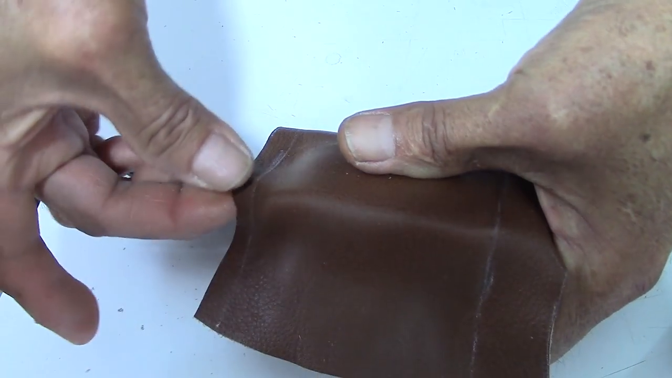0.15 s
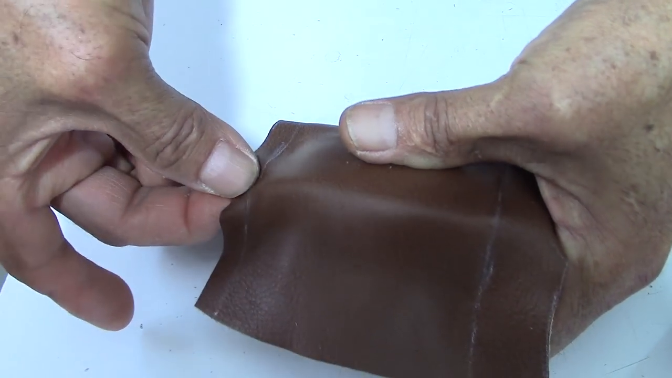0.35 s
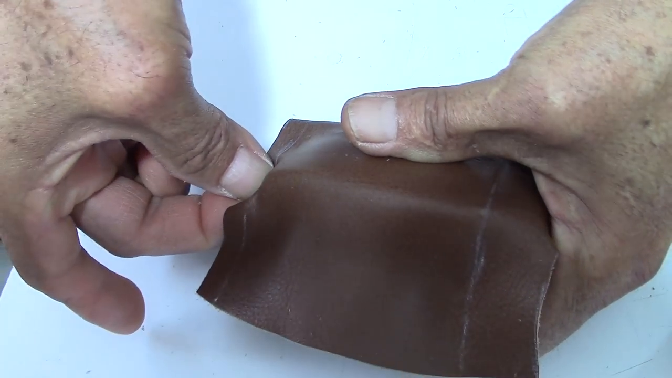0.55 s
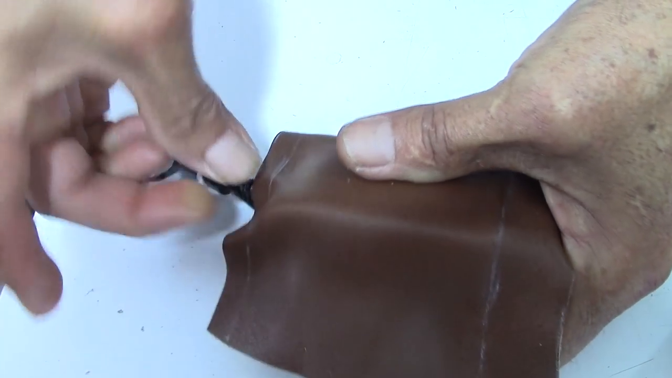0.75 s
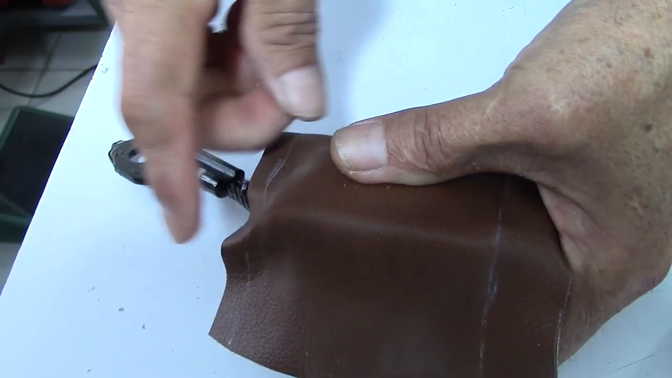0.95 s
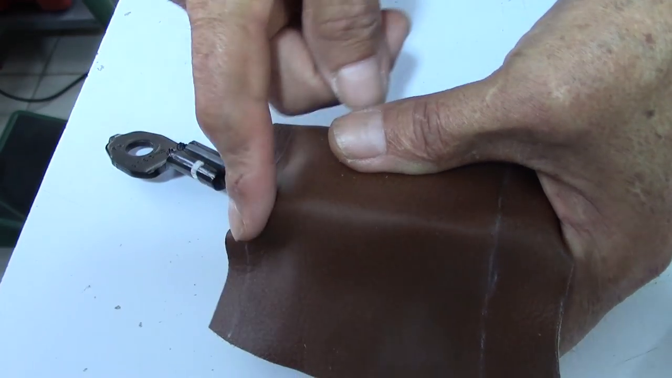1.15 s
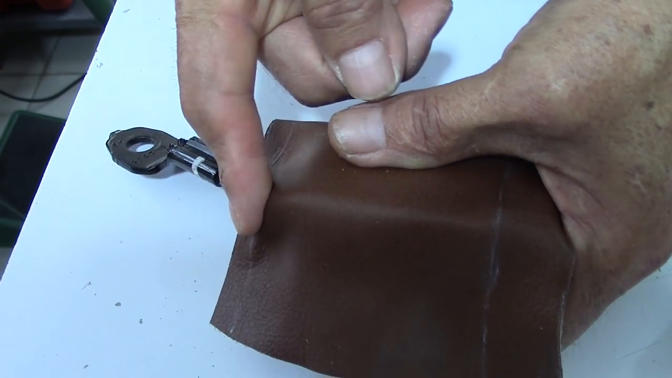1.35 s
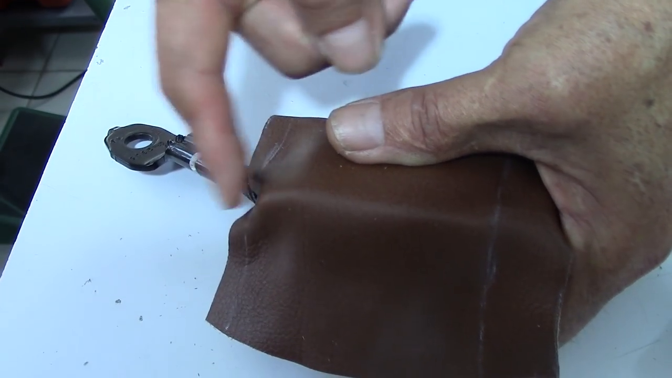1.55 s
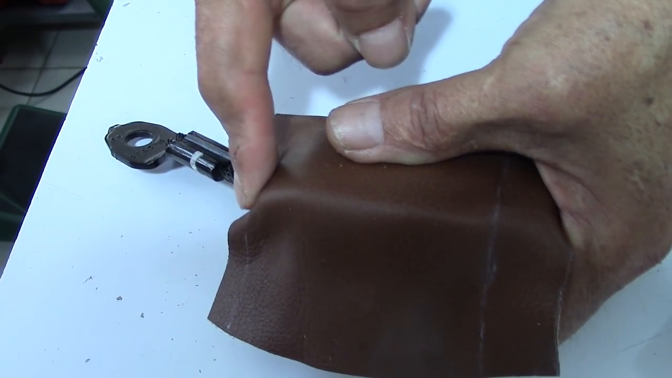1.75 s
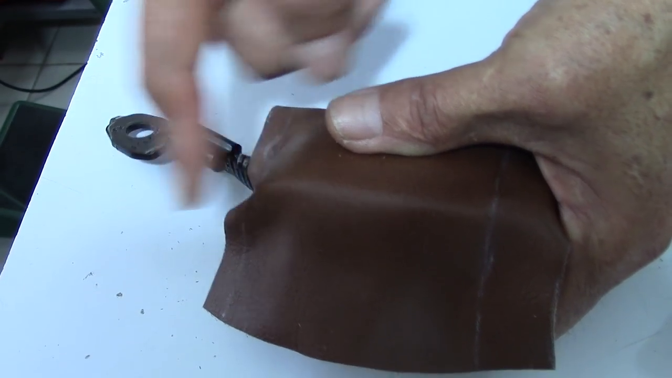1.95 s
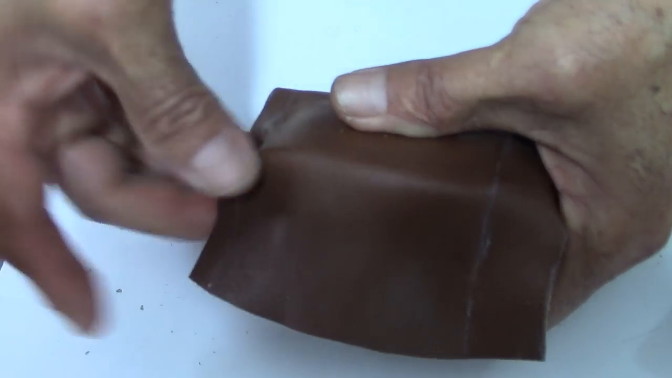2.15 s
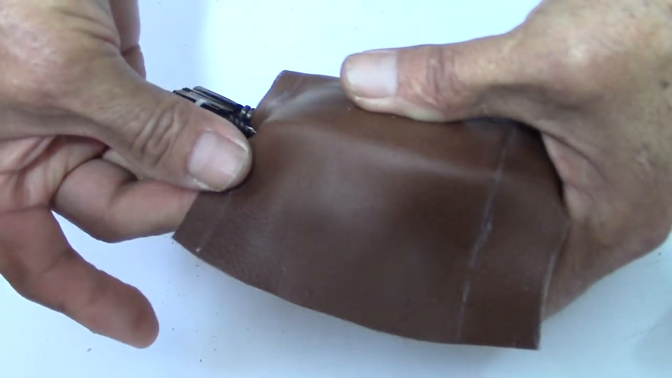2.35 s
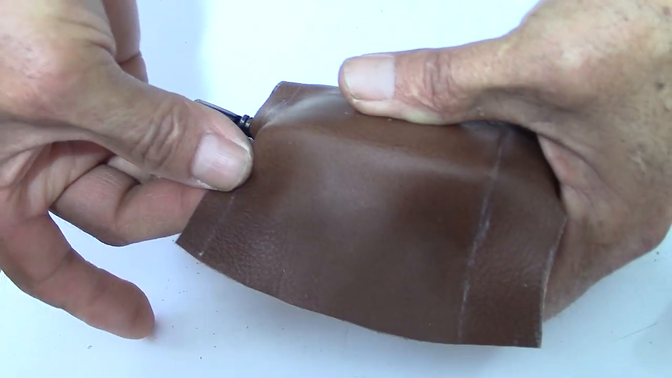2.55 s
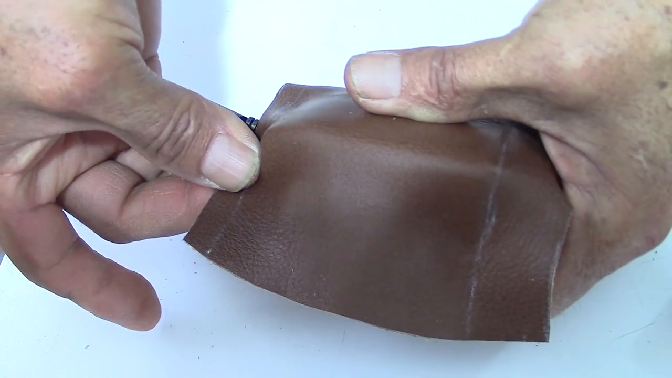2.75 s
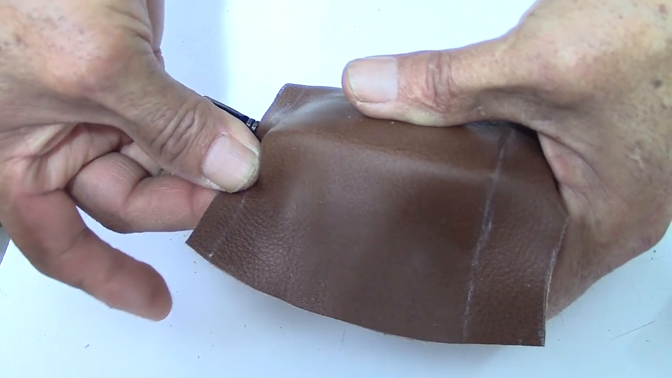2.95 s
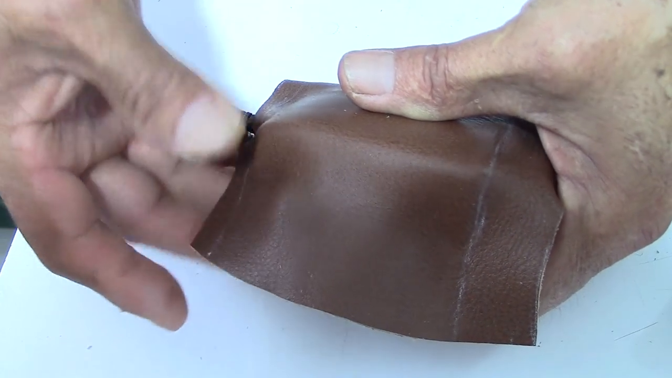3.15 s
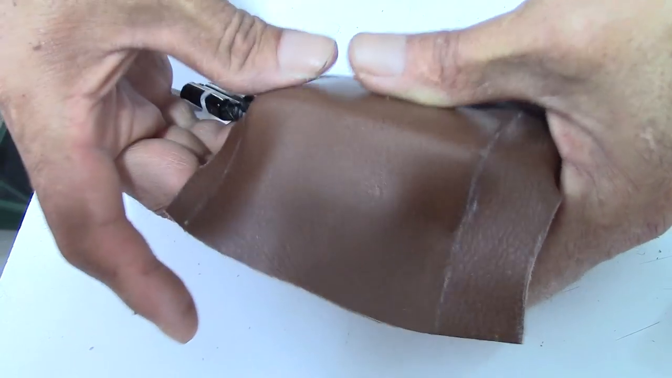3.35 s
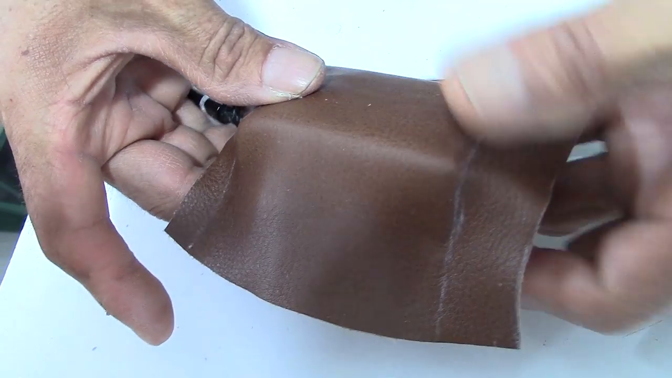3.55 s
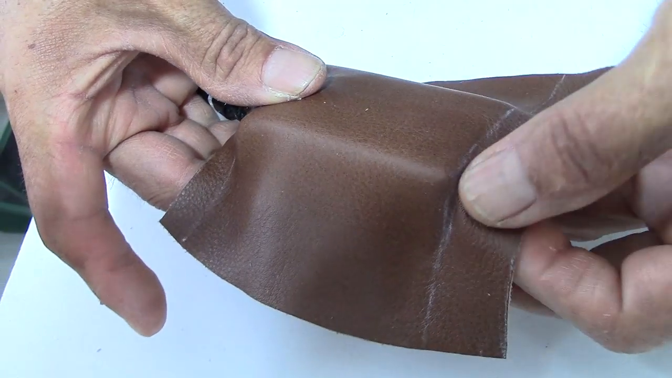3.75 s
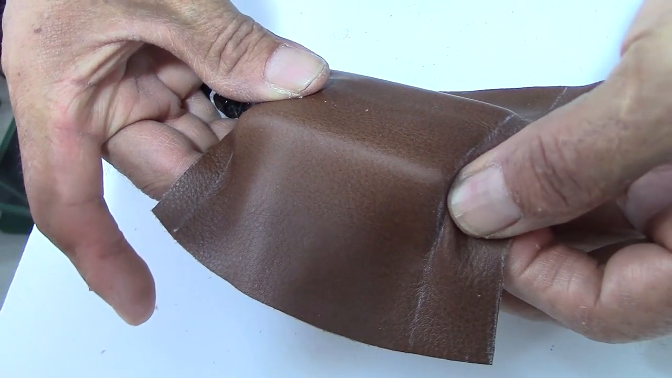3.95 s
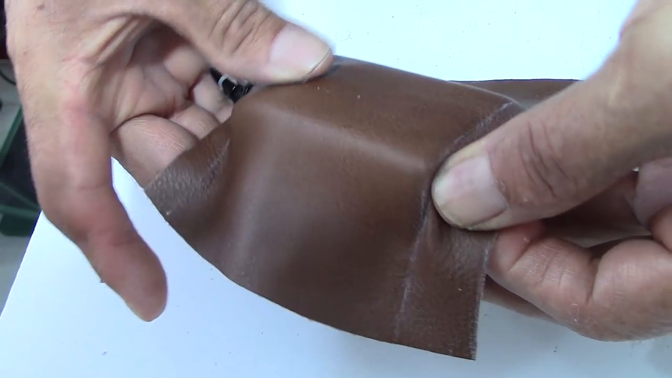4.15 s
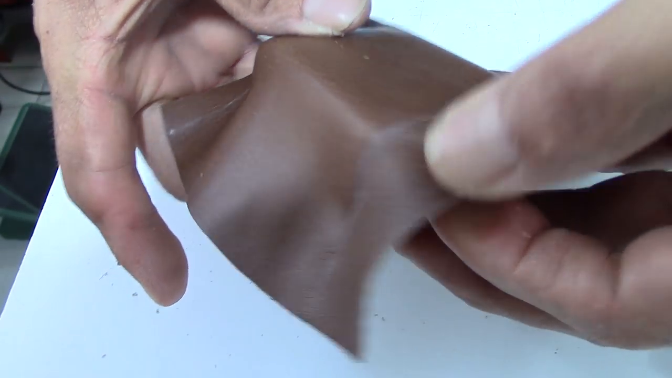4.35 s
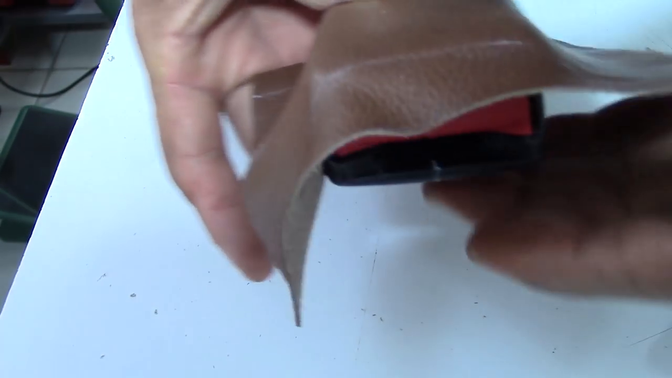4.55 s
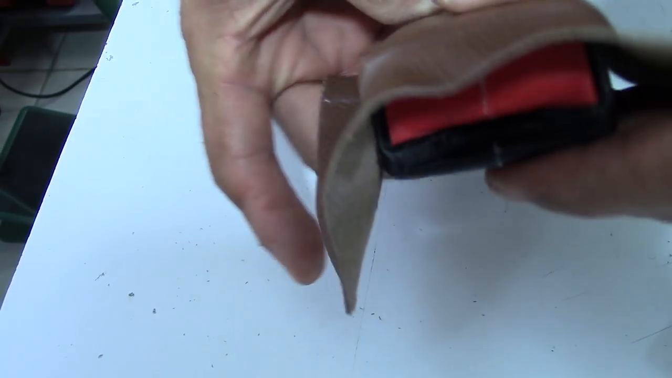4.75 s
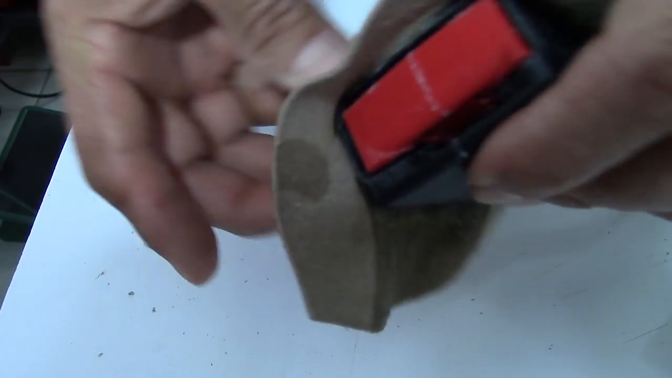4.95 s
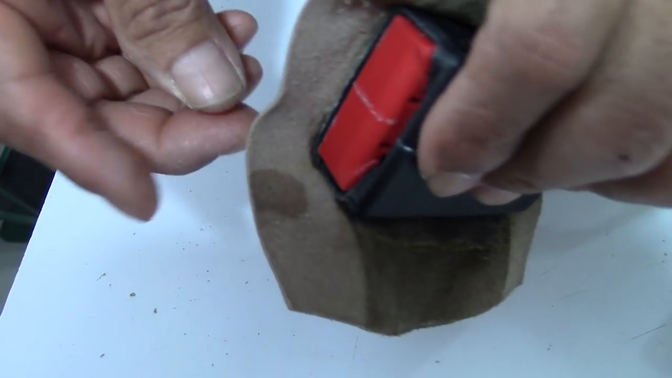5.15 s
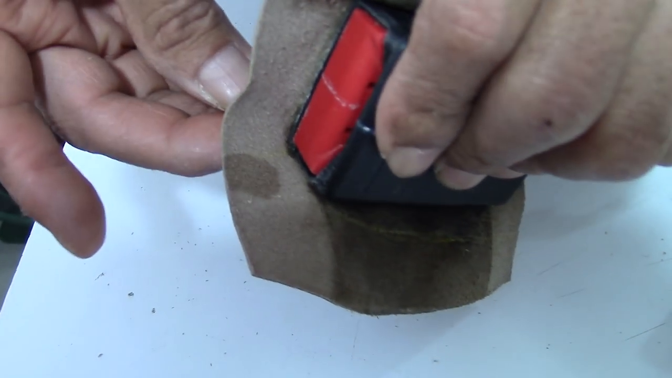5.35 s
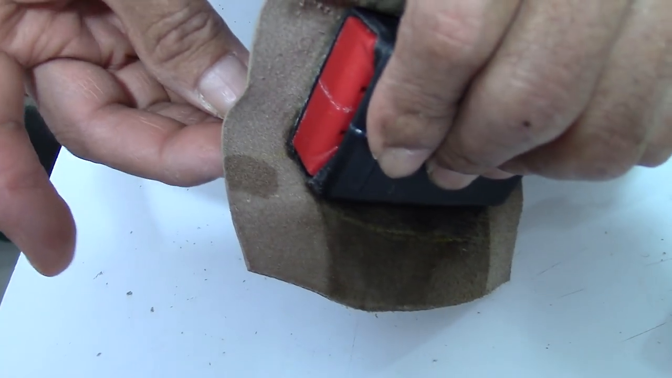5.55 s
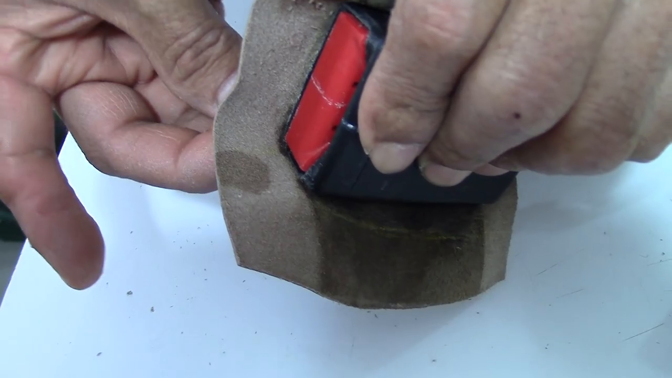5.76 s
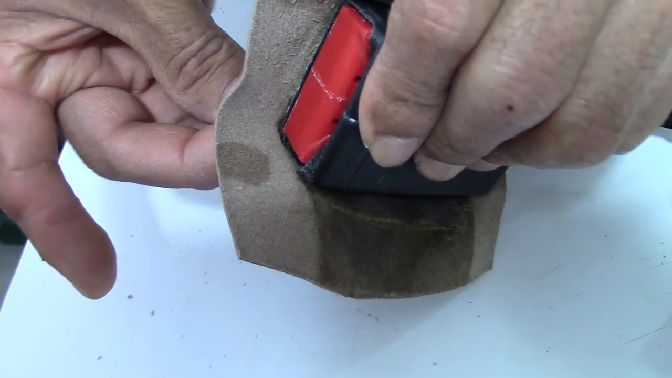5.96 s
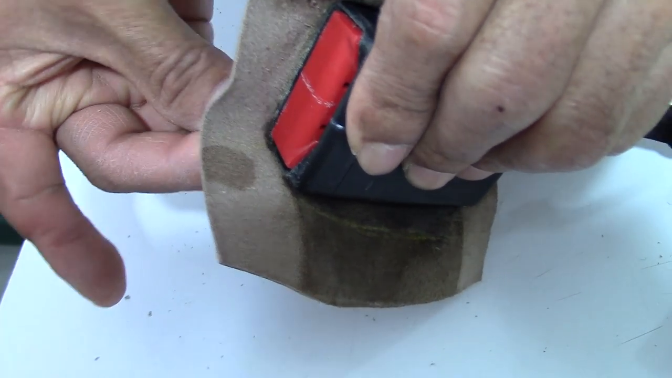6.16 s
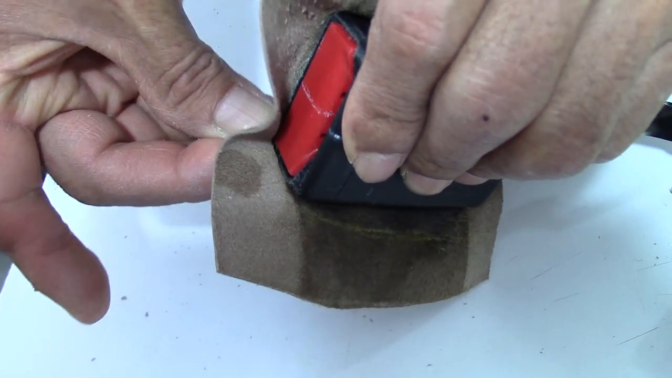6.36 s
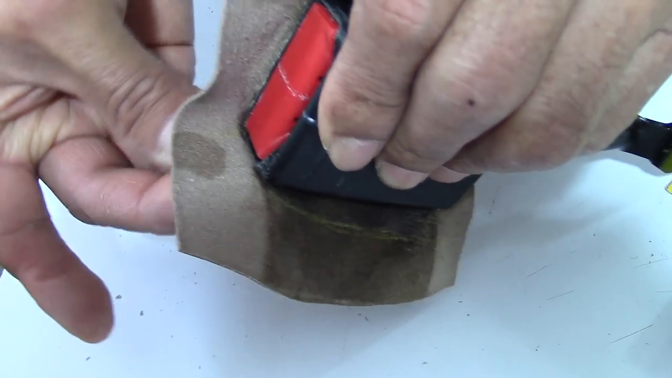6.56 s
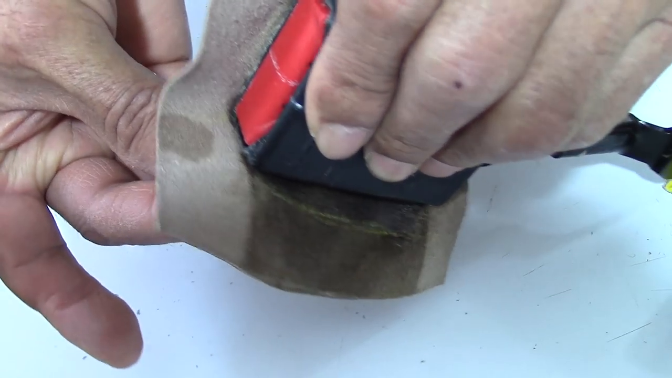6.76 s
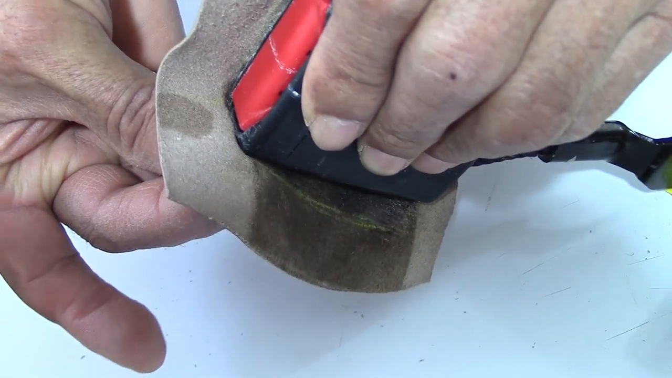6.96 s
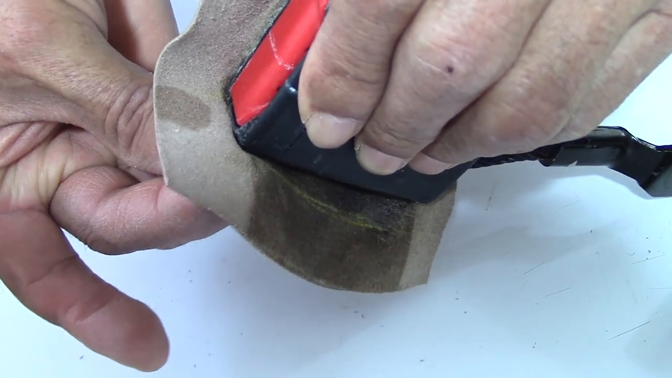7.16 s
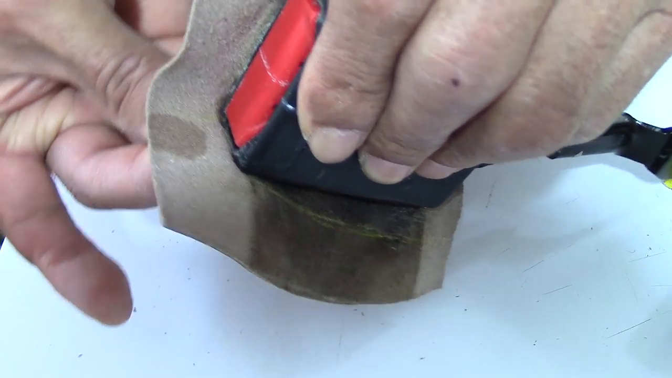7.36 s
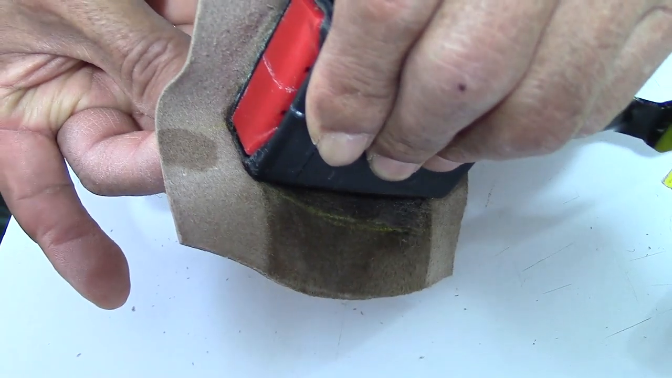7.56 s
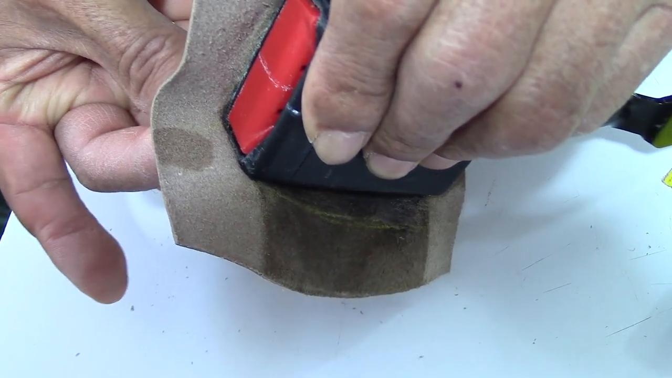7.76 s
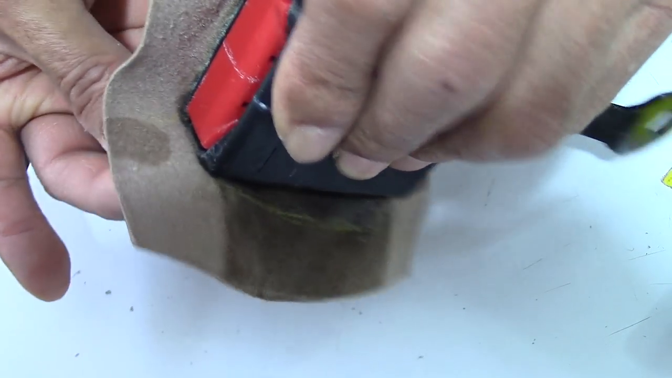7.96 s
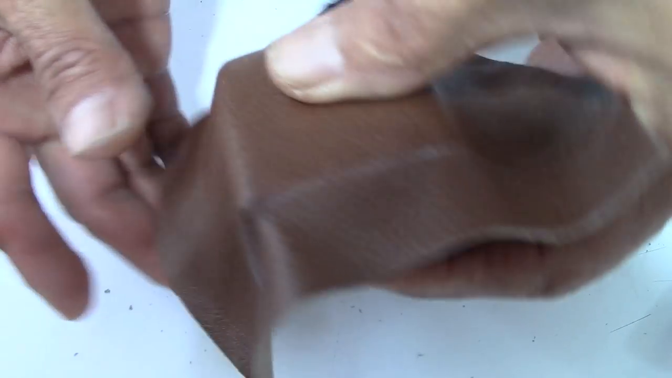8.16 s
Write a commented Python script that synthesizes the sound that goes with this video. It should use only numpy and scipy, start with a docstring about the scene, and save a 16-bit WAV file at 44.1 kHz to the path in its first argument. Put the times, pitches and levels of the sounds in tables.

```python
"""Leather and buckle handled on a hollow table

Hands press leather round a plastic buckle that rests on a hollow table top. Blows and stick-slip drags excite
the board's and the buckle's modes; pushes stir the deep modes and small parts tick as scratches in a resonance.
Fingertips swish over the leather as fine filtered slips; once the buckle is lifted, the leather flexes in dull
modes. Around it lie a small room's short tail, shaped air noise and a faint hum of two wavering tones."""
import sys
import numpy as np
from scipy import signal
from scipy.fft import rfft, irfft, next_fast_len
from scipy.io import wavfile
from scipy.ndimage import map_coordinates

SR = 44100
rng = np.random.default_rng(int(sys.argv[2]) if len(sys.argv) > 2 else 0)


def to_wav(s):
    """Save 16-bit WAV."""
    ch = np.atleast_2d(s).T  # columns
    pcm = np.round(np.clip(ch, -1, 1) * 32767)  # PCM
    wavfile.write(sys.argv[1], SR, pcm.astype(np.int16))


N = 366030  # length [samples]

# The board's resonances, from the lowest two up to the bright ones: (centre [Hz], width [Hz], level [dB])
DEEP_MODES = [(137, 16, -13), (264, 26, 0)]
LOW_MODES = [(319.6, 13, -7.5), (372.4, 27, 1), (436.4, 22, -9.5)]
EDGE_MODES = [(515, 36, 4), (605, 160, -5.5), (711, 50.6, 2), (796, 95, -2.5), (908, 47, -1),
              (1027, 41, 1.5), (1085, 52, -3), (1239, 56, 0), (1323, 89, -9), (1415, 68, -6.5),
              (1606, 55.9, -5.5), (1904, 138.3, -9)]
# Resonances of the buckle's hollow shell: (centre [Hz], width [Hz], level [dB])
SHELL_MODES = [(2100, 600, -3), (2477, 86, 5), (2676, 130, 0.5), (3240, 164, -5.5), (3440, 93, -5),
               (4110, 380, -10.5), (5500, 1600, -14)]

LIFT_S = 5.13  # the buckle leaves the board
FIDGET_DB = 5.5  # how far the resting sounds wander
SCUFF_BEND, SWISH_BEND = 0.88, 1.14  # 1: a pointed peak; higher: a flat top with steep flanks


def amp(db):
    """Decibels to gain."""
    return 10 ** (np.asarray(db) / 20)


def unit(x):
    """Scaled to rms 1."""
    return x / np.sqrt(np.mean(x ** 2) + 1e-20)


def along(points, hz):
    """A curve through (frequency, value) points on a log frequency axis."""
    f, v = np.transpose(points)
    return np.interp(np.log(hz + 1), np.log(f + 1), v)


def wobble(rate):
    """A smooth random curve, rate knots a second."""
    knots = rng.standard_normal(int(N * rate / SR) + 4)
    return map_coordinates(knots, [np.arange(N) * rate / SR])


def filtered(x, response):
    """x with its spectrum multiplied by a response, which may be complex."""
    m = next_fast_len(N + SR // 2)
    return irfft(rfft(x, m) * response(np.fft.rfftfreq(m, 1 / SR)), m)[..., :N]


def soft(x, hz):
    """A yielding contact rounds off the force above hz."""
    return filtered(x, lambda f: 1 / (1 + 1j * f / hz) ** 2)


def resonant(modes):
    """Causal response of a set of modes, added with alternating signs."""
    def response(f):
        total = 0
        for k, (centre, width, db) in enumerate(modes):
            band = 1j * f * width / (centre * centre - f * f + 1j * f * width)
            total = total + (-1) ** k * amp(db) * band
        return total
    return response


def ring(modes, t, spread_db):
    """Modes struck once, each at a new strength and fading faster the wider it is; peak 1."""
    y = 0
    for k, (hz, width, db) in enumerate(modes):
        strength = (-1) ** k * amp(db + rng.normal(0, spread_db)) * width
        y = y + strength * np.exp(-np.pi * width * t) * np.sin(2 * np.pi * hz * t)
    return y / np.abs(y).max()


def grit(rate, spread_db, clump_db):
    """Stick-slip force: random slips of uneven size, rate a second, coming in clumps."""
    sizes = rng.standard_normal(N) * amp(spread_db * rng.standard_normal(N))
    slips = (rng.random(N) < rate / SR) * sizes
    return slips * amp(clump_db * wobble(70))


def strokes(rows, bend):
    """Power over time of the main layer and of each relative column, summed over swelling, dying strokes."""
    peak, rise, fall, db, *relative = np.transpose(rows)[:, :, None]
    grid = np.arange(0, N / SR + .001, .001)  # seconds, in 1 ms steps
    distance = np.where(grid < peak, (peak - grid) / np.abs(rise), (grid - peak) / np.abs(fall))
    shape = db - 20 * distance ** bend
    t = np.arange(N) / SR
    return [np.interp(t, grid, np.sum(amp(shape + r) ** 2, axis=0)) for r in [0, *relative]]


def idle(levels_db, when):
    """Power of faint sounds that wander by themselves."""
    return when * np.array([amp(db + FIDGET_DB * wobble(13)) ** 2 for db in levels_db])


def rubbed(power, layers):
    """Each layer drives its slips into its modes, which ring on after the force stops;
    the force leads the level heard by the time the modes take to build up."""
    out = np.zeros(N)
    for (modes, force), p in zip(layers, power):
        lead = round(.3 * SR / max(width for hz, width, db in modes))
        scale = np.sqrt(np.mean(filtered(force, resonant(modes)) ** 2))
        push = np.pad(np.sqrt(p[lead:]), (0, lead))
        out += filtered(force * push / scale, resonant(modes))
    return out


def air():
    """Steady room noise, partly shared by both channels, with two faint wavering tones."""
    # Colour of the air noise: (frequency [Hz], level [dB])
    air_colour = [(20, -33), (42, -28.5), (70, -13), (100, -20), (125, -11.5), (170, -5), (260, -4),
                  (440, -4), (700, -9), (1200, -10), (2700, -17.5), (6400, -23), (11000, -32), (16000, -34)]
    # Likeness of left and right: (frequency [Hz], correlation [-1 to 1])
    air_likeness = [(30, 0.34), (120, 0.89), (1000, 0.52), (4000, 0.765), (10000, 0.73), (15000, 0.99)]
    # The hum's tones: (frequency [Hz], rms level about which it wavers [dB])
    hum_tones = [(226, -75), (705.5, -74.5)]
    air_db = -61.5

    def mid_and_side(hz):
        turn = np.arccos(np.clip(along(air_likeness, hz), -1, 1)) / 2
        return amp(along(air_colour, hz)) * [np.cos(turn), np.sin(turn)]

    mid, side = filtered(rng.standard_normal((2, N)), mid_and_side)
    out = amp(air_db + 0.2 * wobble(4.0)) * unit(np.array([mid + side, mid - side]))
    t = np.arange(N) / SR
    for hz, db in hum_tones:
        level = np.sqrt(2) * amp(db + 2.3 * wobble(10))
        out = out + level * np.sin(2 * np.pi * hz * t + 0.23 * wobble(15))
    return out


def pulls():
    """Power of the five layers while the buckle is pulled long and hard across the board."""
    # Two pulls, each a list of points:
    # (time [s], edge scrape [dB], then relative to the scrape: rumble [dB], shell ring [dB])
    long_pulls = [
        [(4.335, -27.5, 4, -12), (4.375, -25.5, 1.5, -11), (4.437, -22, -5.5, -6.5), (4.465, -22, -3.5, -9),
         (4.485, -27, 11.5, -2.5), (4.501, -29.5, -1.5, -7), (4.537, -44, 8, -5.5), (4.64, -58, -8.5, -1.5)],
        [(4.715, -22.5, 12, -11), (4.755, -31, -16.5, -12), (4.775, -26, 8.5, -9.5), (4.821, -23, 2, -15),
         (4.893, -46.5, 7, -6), (5.025, -65, 0, -5.5), (5.12, -68, -8, 0.5)],
    ]
    # Mode groups relative to the rumble: (lowest [dB], deep [dB], low [dB])
    group_db = [-44, -3, -1.5]
    power, t = np.zeros((5, N)), np.arange(N) / SR
    for rows in long_pulls:
        s, edge, rumble, shell = np.transpose(rows)
        edge, rumble, shell = (np.interp(t, s, v) for v in (edge, edge + rumble, edge + shell))
        levels = [*(rumble + db for db in group_db), edge, shell]
        power += amp(levels) ** 2 * ((t > s[0]) & (t < s[-1]))
    return power


def drag():
    """Slips under the moving buckle drive the board and the buckle's hollow shell."""
    # Short scuffs: (peak time [s], rise by 20 dB [s], fall by 20 dB [s], edge scrape [dB],
    # then relative to the scrape: deep rumble [dB], low rumble [dB], shell ring [dB])
    scuffs = [(0.002, 0.018, 0.055, -44, 16.5, -13, -11), (.06, 0.0084, 0.056, -47, 5, 2, -19),
              (.13, .02, .13, -47.5, -3, -2, -10), (.335, 0.3, 0.017, -60, 9, -12, -5),
              (.386, .03, 0.05, -63, 15, -11.5, 0), (.485, 0.06, 0.22, -47, 6, -13, -6.5),
              (.545, 0.09, 0.048, -36, 1, -3, -18), (.71, 0.035, 0.043, -30, -6, -10, -16.5),
              (.8, 0.15, 0.057, -40.5, 2, 4.5, -9.5), (.97, 0.035, 0.069, -73, -9, -17, -17),
              (1.105, .02, 0.027, -66, -9, -9, 2), (1.204, 0.036, 0.037, -58.5, 8.5, 3, -8),
              (1.25, .04, 0.051, -59, -6, -8, -12), (1.33, 0.059, 0.05, -59, -3, -8, -12),
              (1.454, 0.018, 0.059, -52.5, 8, -1, -3), (1.525, 0.094, 0.02, -50, 6, 4.5, -13),
              (1.626, 0.054, 0.16, -60.5, -6, 2, -9), (1.734, 0.044, 0.019, -51, 2, -6, -13),
              (1.822, 0.03, 0.064, -57, -8, 0, -2), (1.9, 0.052, 0.047, -61, -5, 1, -15),
              (1.982, 0.076, .07, -53, 8, -6.5, -7), (2.112, 0.045, 0.038, -48, 0, -0.5, -14),
              (2.26, 0.042, 0.12, -36.5, 1.5, -6, -8), (2.43, 0.14, 0.099, -57.5, -17, -15, 0),
              (2.615, 0.032, 0.11, -40.5, 5.5, -3, -13.5), (2.798, 0.1, 0.038, -48, -2, -6, -11.5),
              (2.972, 0.041, 0.031, -49, -2, -20, -7), (3.098, 0.096, 0.049, -51.5, 1.5, -4, -1),
              (3.144, 0.02, 0.013, -56, 0, 4, 7), (3.244, 0.056, 0.16, -45.5, 2.5, 0, -9),
              (3.32, .05, 0.039, -58.5, 0, 7, 8.5), (3.425, 0.11, 0.024, -53, -15, -14, -1.5),
              (3.475, 0.013, 0.12, -42, 11, 12, -12), (3.54, .08, .06, -51.5, 3, 5, -1),
              (3.6, 0.056, 0.066, -37.5, 1.5, 5.5, -10), (3.725, 0.052, 0.12, -52, 5, 4, -6.5),
              (4.035, 0.3, 0.027, -58, 6, -2, -3.5), (4.17, 0.075, 0.11, -43.5, -13, 6.5, -5.5),
              (4.255, .1, 0.053, -34.5, 3, 3, -8)]
    # Small shifts under the hands until the lift: (lowest [dB], deep [dB], low [dB], edge [dB], shell [dB])
    resting_db = [-69.5, -67, -73.5, -70.5, -80.5]
    lowest_db = -11.5  # the lowest board mode in a scuff, relative to the deep rumble
    edge, deep, low, shell = strokes(scuffs, SCUFF_BEND)
    scuff_power = np.array([amp(lowest_db) ** 2 * deep, deep, low, edge, shell])
    power = scuff_power + pulls() + idle(resting_db, np.arange(N) < LIFT_S * SR)
    return rubbed(power, [(DEEP_MODES[:1], soft(grit(960, 2.3, 0.93), hz=254.4)),
                          (DEEP_MODES[1:], soft(grit(1100, 1.6, 1.2), hz=486)),
                          (LOW_MODES, soft(grit(1200, 0.39, 0.55), hz=620)),
                          (EDGE_MODES, soft(grit(3500, 1.8, .8), hz=2000)),
                          (SHELL_MODES, soft(grit(3500, 0.87, 2.0), hz=4500))])


def swish():
    """Very fine, dense slips on the leather's grain: firm pressure rasps lower, light fingertips hiss higher."""
    # Fingers sliding: (peak time [s], rise by 20 dB [s], fall by 20 dB [s], rasp [dB],
    # hiss relative to the rasp [dB])
    slides = [(.28, 0.25, 0.18, -68.5, -12), (.53, .15, 0.076, -65, -6), (.702, 0.028, 0.027, -52.5, -3),
              (.76, 0.13, 0.11, -63.5, -1), (1.02, 0.048, 0.1, -71.5, 8), (1.36, .05, 0.073, -77, -13),
              (1.48, .07, 0.078, -64.5, -5), (1.62, 0.09, .05, -82, -13), (1.83, 0.046, 0.056, -67, -9),
              (1.96, .09, .1, -68.5, -11), (2.17, 0.33, .04, -70.5, -6), (2.22, 0.049, .03, -64, -4),
              (2.24, .02, 0.014, -64, -16), (2.295, 0.03, 0.02, -53.5, 1.5), (2.435, 0.07, 0.072, -60.5, 1),
              (2.59, .04, .05, -65, -16), (3.078, 0.032, 0.028, -54.5, -1.5),
              (3.137, 0.017, 0.019, -50.5, -1), (3.23, .04, .05, -67.5, 2), (3.33, 0.073, 0.013, -63.5, 9),
              (3.44, 0.22, 0.12, -60.5, -3), (3.58, .15, 0.097, -57, -8), (3.79, 0.045, 0.017, -57.5, -8),
              (3.95, 0.35, 0.04, -70, -5), (4.15, 0.03, 0.18, -57.5, 6), (4.24, .15, 0.1, -62.5, 4.5),
              (4.35, 0.051, 0.042, -48.5, -11.5), (4.44, 0.067, 0.054, -47.5, -19),
              (4.5, 0.092, .02, -51, -16), (4.71, 0.06, 0.037, -66, -13), (4.795, 0.044, .08, -48.5, -8),
              (4.92, .08, 0.11, -63, -4), (5.8, 0.59, 0.4, -72.5, -18.5), (6.2, 0.15, 0.034, -75, 0),
              (6.55, .07, 0.076, -55, -5), (6.81, 0.073, 0.052, -61, -2.5), (7.42, 0.049, 0.061, -62, -5.5),
              (7.86, 0.023, 0.032, -75, 6), (7.9, 0.034, .045, -66.5, -2), (8.16, 0.29, .27, -68.5, -4)]
    # Colour of leather under a finger: (frequency [Hz], level [dB])
    leather_colour = [(2500, -28), (3500, -2), (5060, -7.5), (6780, -0.5), (9320, -2.5), (12000, -8),
                      (14500, -19), (16000, -29)]
    # Fingers merely holding on: (rasp [dB], hiss [dB])
    touch_db = [-82, -83.5]

    def upper(hz):  # share of power that goes to the hiss
        return 1 / (1 + (8200 / (hz + 1)) ** 8)

    rasp = filtered(grit(7000, 1.8, 2.5), lambda hz: amp(along(leather_colour, hz)) * np.sqrt(1 - upper(hz)))
    hiss = filtered(grit(8760, 1.1, 2.4), lambda hz: amp(along(leather_colour, hz)) * np.sqrt(upper(hz)))
    firm, light = np.sqrt(np.array(strokes(slides, SWISH_BEND)) + idle(touch_db, 0.75))
    return firm * unit(rasp) + light * unit(hiss)


def knocks():
    """Each blow raps once, sets the board and the shell ringing and starts with a short crack."""
    # Blows on the board: (time [s], level [dB], then relative to it:
    # deep thud [dB], low thud [dB], shell [dB], crack [dB])
    blows = [(0.0368, -27.5, 2.5, -16, -16.5, -41), (0.1063, -21.5, -1, -12, -9.5, -32.5),
             (0.6839, -34.5, -6, -7, -12.5, -21), (0.706, -28.5, -6, -16, -11, -25),
             (1.3515, -45, -18, -24, -9, -11), (1.3601, -36.5, -13, -26, -5, -10.5),
             (2.2294, -9, -0.5, -16, -6, -15.5), (2.5878, -12.5, 1.5, -14, -13.5, -24),
             (2.964, -44, -4, -7.5, -2, -10), (3.2225, -34, -16, -10, -14, -24),
             (3.4511, -18, 6.5, -15, -2.5, -12), (3.4877, -31, 10.5, 4, -1.5, -23),
             (4.327, -16, -7.5, -31, -8, -12), (4.4639, -19.5, -18, -1.5, 1, -30),
             (4.7014, -6.5, -2, -5, -2, -13)]
    thud_lag_s = .0011  # the deepest modes answer after the wave has crossed the board
    out, t = np.zeros(N + SR), np.arange(SR // 4) / SR
    swell = 1 - np.exp(-t / .004)  # the board takes a cycle to move as a whole
    for s, db, deep_db, low_db, shell_db, crack_db in blows:
        rap = 1.4 * np.sin(2 * np.pi * 1250 * t) * np.exp(-t / 0.0013)  # the plastic's own short, hard contact
        deep = amp(deep_db) * ring(DEEP_MODES, np.maximum(t - thud_lag_s, 0), 0.76)
        low = amp(low_db) * ring(LOW_MODES, t, 1.8)
        thud = swell * (deep + low)
        crack_fade = np.exp(-t / 0.0026) + .25 * np.exp(-t / 0.0058)
        crack = amp(crack_db) * crack_fade * rng.standard_normal(len(t))
        edge = 0.89 * ring(EDGE_MODES, t, 2.5)
        shell = amp(shell_db) * ring(SHELL_MODES, t, 4.8)
        out[round(s * SR):][:len(t)] += amp(db) * (rap + thud + edge + shell + crack)
    return soft(soft(out[:N], hz=6680), hz=14000)


def nudges():
    """A slow push of the hand's weight rings only the two deepest board modes."""
    # Soft pushes: (time [s], strength [dB], lowest mode relative to the other [dB])
    pushes = [(0.176, -32, -13), (0.319, -30.5, -7), (0.395, -40, -11), (0.483, -26, -26),
              (0.529, -26, -35), (0.697, -25, -27), (0.779, -21, -14), (.85, -46, 6), (1.383, -52, 15.5),
              (1.456, -37, -28), (1.508, -24.5, -26), (1.736, -42.5, -26.5), (1.969, -32, -33),
              (2.124, -30.5, -19), (2.638, -31, -2), (2.796, -33, -5), (2.963, -32, -7), (3.58, -25, -32),
              (3.72, -45, -21.5), (4.026, -42.5, -53), (4.156, -23, -44), (4.179, -47, -21.5),
              (4.262, -23, -15)]
    out, t = np.zeros(N + SR), np.arange(SR // 4) / SR
    swell = (1 - np.exp(-t / 0.0042)) ** 2
    for s, db, lowest_db in pushes:
        both = ring(DEEP_MODES[1:], t, 0) + amp(lowest_db) * ring(DEEP_MODES[:1], t, 0)
        out[round(s * SR):][:len(t)] += amp(db) * swell * both
    return out[:N]


def ticks():
    """Small parts tick: a brief scratch through one broad resonance."""
    # Dry ticks: (time [s], level [dB], pitch [Hz], decay time constant of the scratch [s])
    dry_ticks = [(.429, -46, 1800, 0.002), (1.0895, -44.5, 1980, 0.0041), (1.4547, -41.5, 1305, 0.0028),
                 (1.6061, -43, 2030, 0.0013), (1.606, -43, 7000, 0.0015), (2.217, -31.5, 8950, 0.0018),
                 (2.581, -30, 1410, 0.00041), (3.128, -36.5, 1980, 0.011), (3.1869, -45, 1400, 0.0027),
                 (3.374, -35.5, 2320, 0.0053), (3.817, -36.5, 8000, 0.00087), (3.871, -47.5, 9000, 0.0011),
                 (4.6508, -28, 1890, 0.0044), (4.6957, -29.5, 2240, 0.0011), (5.9843, -44, 3000, 0.0007),
                 (6.4925, -44, 2320, 0.0026), (7.0444, -53, 2410, .003), (7.4015, -34, 2180, 0.0084),
                 (7.86, -44, 2650, .0015), (7.871, -41, 6200, 0.0012), (7.8785, -44, 1900, .002),
                 (8.1461, -43.5, 2400, .0015), (8.147, -40, 6300, .0015)]
    out, t = np.zeros(N + SR), np.arange(SR // 20) / SR
    for s, db, hz, decay in dry_ticks:
        scratch = np.exp(-t / decay) * rng.standard_normal(len(t))
        resonance = np.sin(2 * np.pi * hz * t) * np.exp(-t * hz / 1.3)
        tick = signal.fftconvolve(scratch, resonance)[:len(t)]
        out[round(s * SR):][:len(t)] += amp(db) * tick / np.abs(tick).max()
    return soft(out[:N], hz=9000)


def flex():
    """Off the table only the leather's dull, broad resonances and the shell answer."""
    # Leather flexing round the lifted buckle: (peak time [s], rise by 20 dB [s], fall by 20 dB [s],
    # creak [dB], then relative to the creak: low flap [dB], shell ring [dB])
    flexes = [(5.19, 0.028, 0.13, -64.5, -6, -19), (6.076, .03, 0.17, -53, -4, -31),
              (6.2, 0.23, 0.22, -52.5, -22, -23), (6.3, .1, 0.12, -58, -17, -25),
              (6.55, 0.082, 0.081, -58, 1, 4.5), (6.71, 0.18, .03, -61, -9, -30),
              (6.824, 0.056, 0.021, -59, -6, 7.5), (7.412, 0.02, 0.087, -45.5, 10.5, -9),
              (7.45, 0.069, 0.12, -56.5, 17, -18), (7.87, 0.017, 0.074, -69.5, -0.5, 9),
              (8.068, 0.11, 0.043, -67, -17, -5), (8.14, .1, 0.22, -72, -8, 4)]
    # Small shifts in the grip after the lift: (flap [dB], creak [dB], shell [dB])
    held_db = [-78.5, -73.5, -94.5]
    # Leather resonances, low flap and higher creak: (centre [Hz], width [Hz], level [dB])
    flap_modes = [(132, 22, -10.5), (177, 110, -12), (252, 81, -4)]
    creak_modes = [(452, 177, 2), (760, 400, -0.5), (1090, 720, -6)]
    creak, flap, shell = strokes(flexes, SCUFF_BEND)
    power = np.array([flap, creak, shell]) + idle(held_db, np.arange(N) >= LIFT_S * SR)
    return rubbed(power, [(flap_modes, soft(grit(900, 2.7, 1.12), hz=403)),
                          (creak_modes, soft(grit(2500, 1.5, 1.2), hz=1500)),
                          (SHELL_MODES, soft(grit(4600, 0.84, 1.2), hz=5900))])


def room(x, side_db):
    """A noise tail whose every frequency dies at its own speed; side_db sets how far the channels differ."""
    # Decay of the small room: (frequency [Hz], time to fall by 60 dB [s])
    room_decay = [(150, 0.19), (1000, 0.15), (4000, 0.16), (12000, 0.053)]
    hz, t, z = signal.stft(rng.standard_normal((2, SR // 2)), SR, nperseg=256)
    fading = z * amp(-60 * t / along(room_decay, hz)[:, None])
    tail = signal.istft(fading, SR, nperseg=256)[1]
    tail = tail / np.linalg.norm(tail[0])
    late = np.pad(x, (250, 0))[None]  # the tail starts 250 samples after the sound
    mid, side = signal.fftconvolve(late, tail, axes=1)[:, :N]
    side = filtered(side, lambda hz: amp(along(side_db, hz)))
    return np.array([mid + side, mid - side])


def scene():
    """Table sounds in the middle, with their room and the steady air."""
    near = drag() + flex() + knocks() + nudges() + ticks() + swish()
    near = filtered(near, lambda hz: (1j * hz / (1j * hz + 105)) ** 5)  # small objects radiate almost no bass
    # side level of the tail: (frequency [Hz], level [dB])
    tail = room(near, side_db=[(100, -43.5), (1000, -16.5), (4000, -3.5), (12000, -11.0)])
    return near + amp(-14.0) * tail + air()


def record(dry):
    """Nothing is kept above the band limit of 15.8 kHz."""
    return filtered(dry, lambda hz: hz < 15800)


dry = scene()
out = record(dry)
to_wav(out)
```